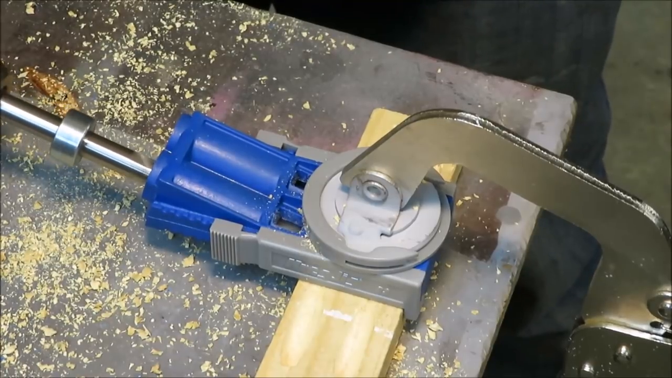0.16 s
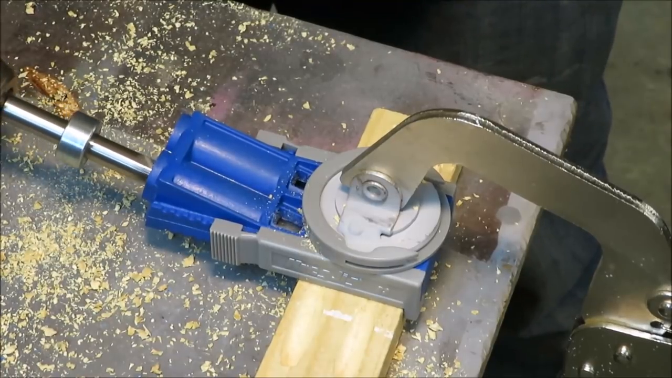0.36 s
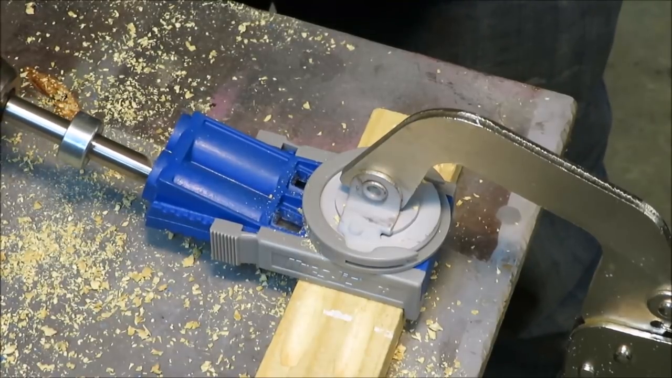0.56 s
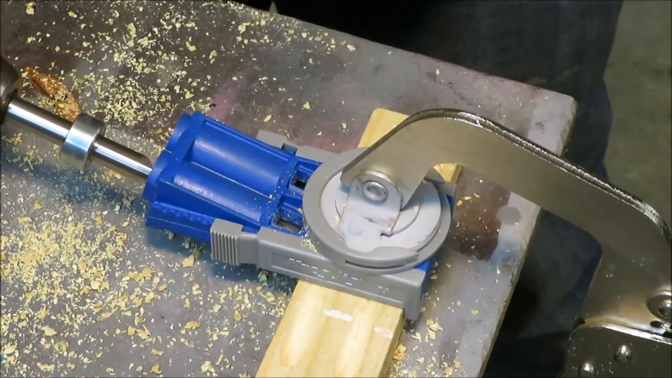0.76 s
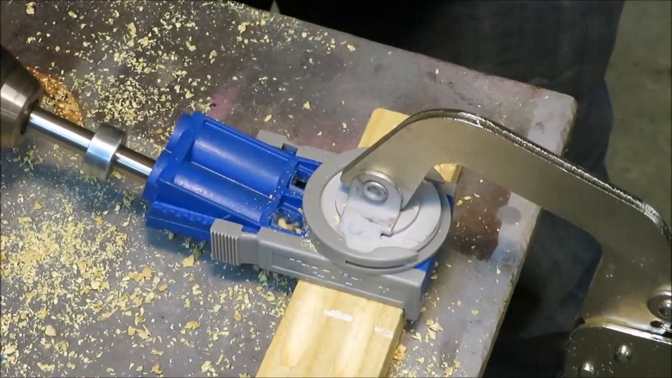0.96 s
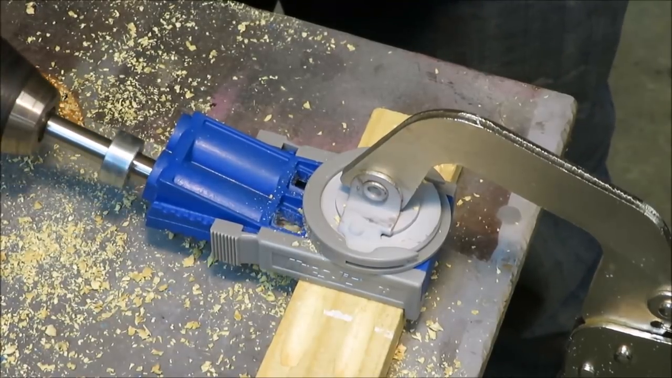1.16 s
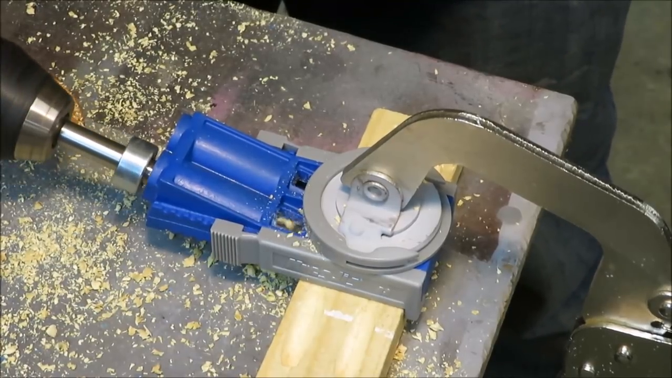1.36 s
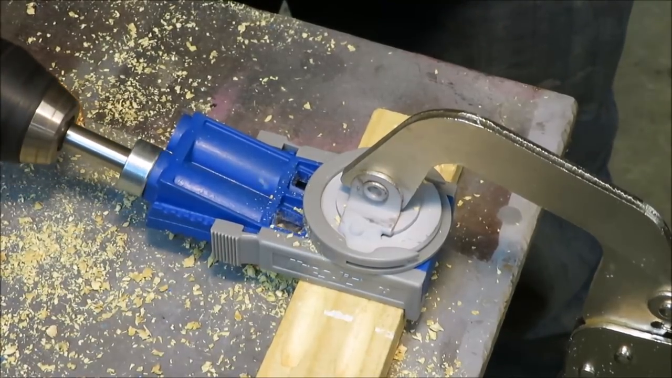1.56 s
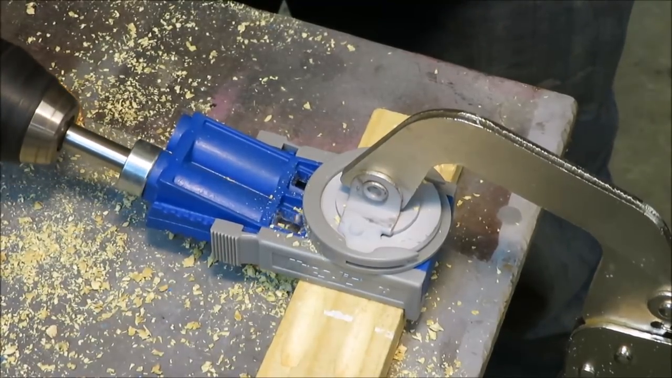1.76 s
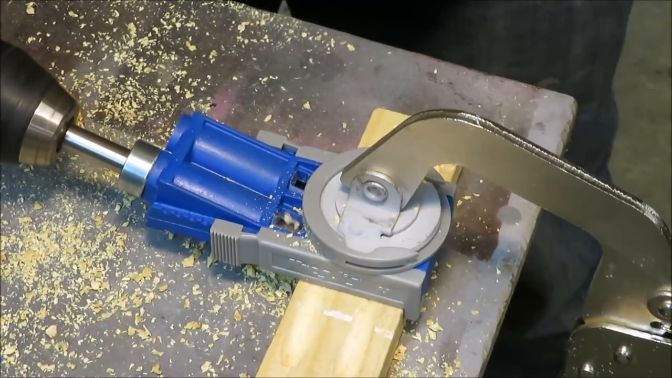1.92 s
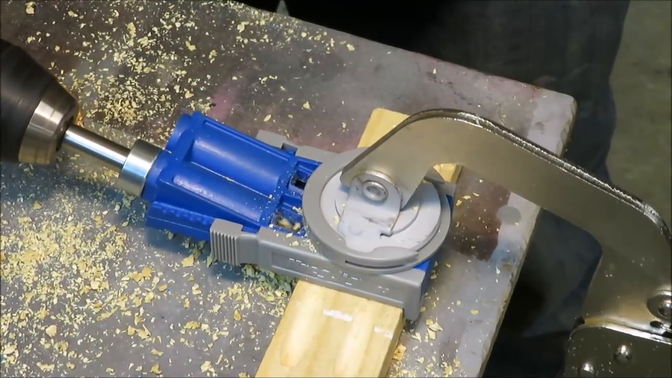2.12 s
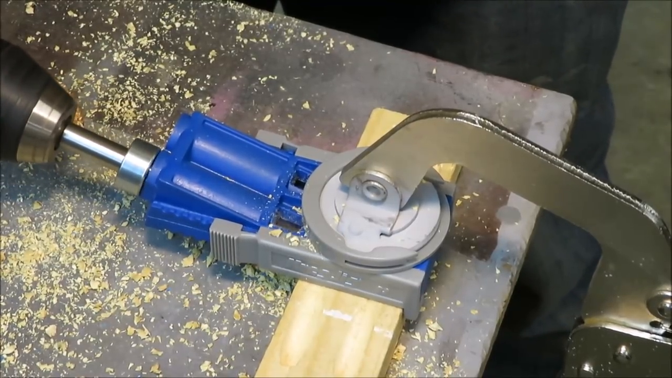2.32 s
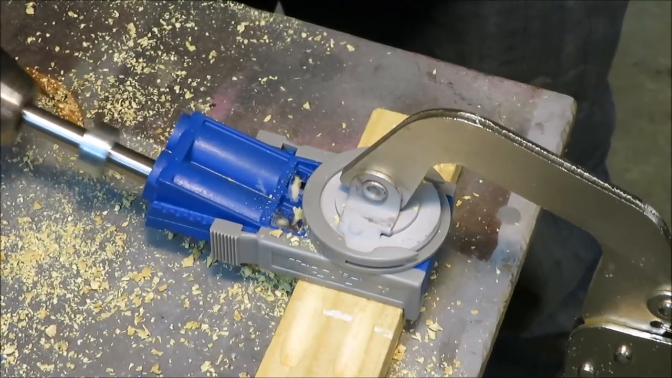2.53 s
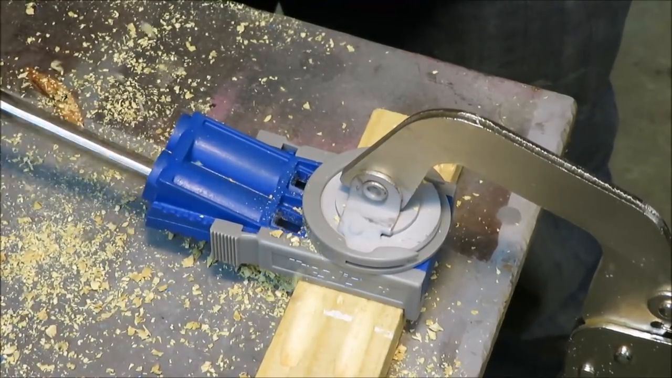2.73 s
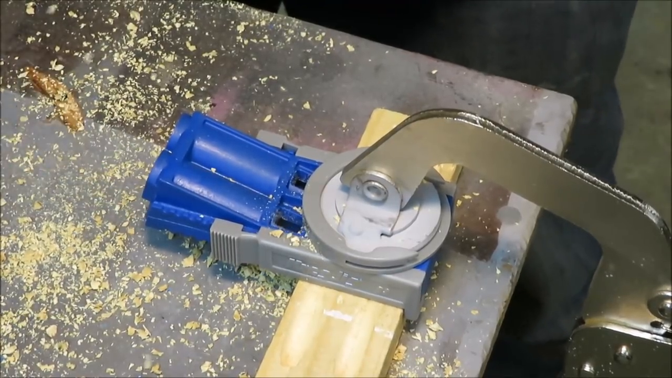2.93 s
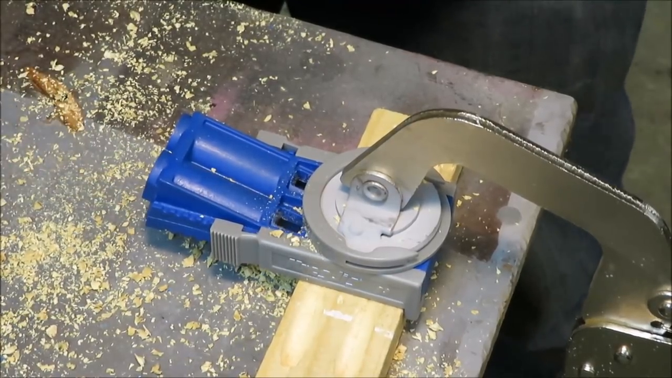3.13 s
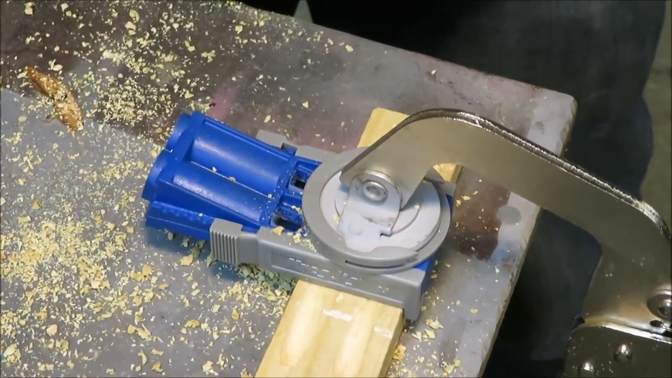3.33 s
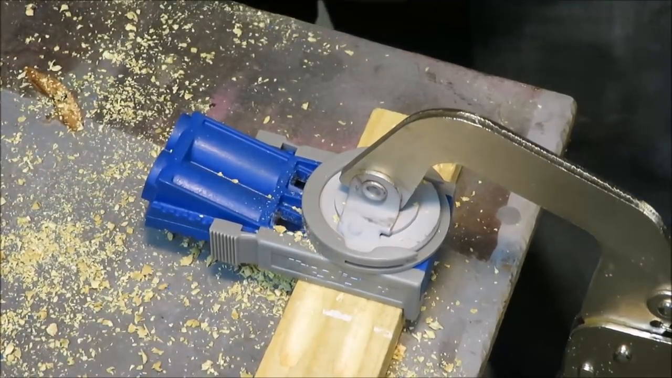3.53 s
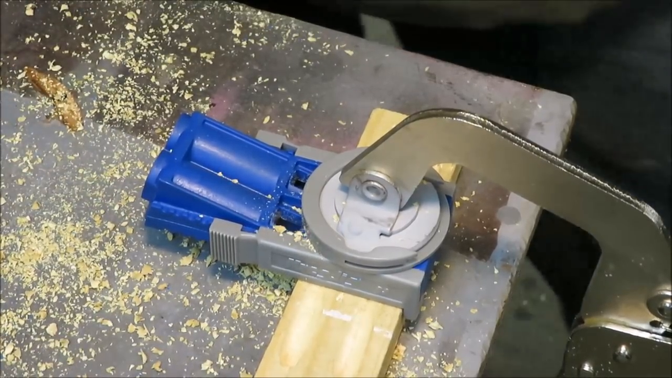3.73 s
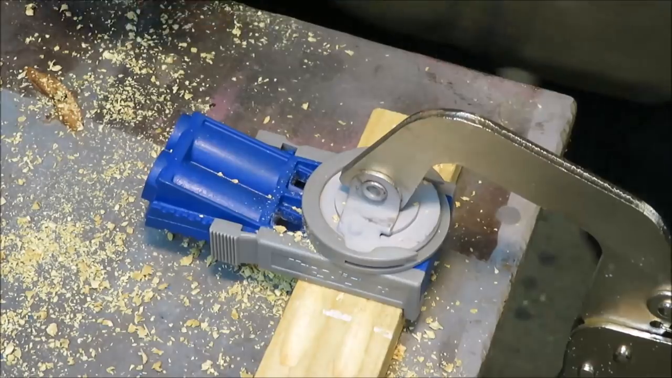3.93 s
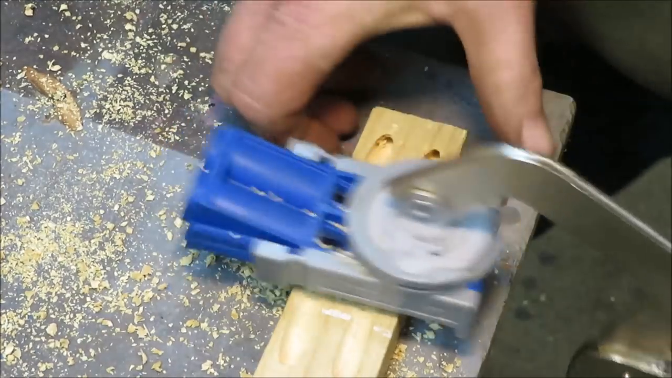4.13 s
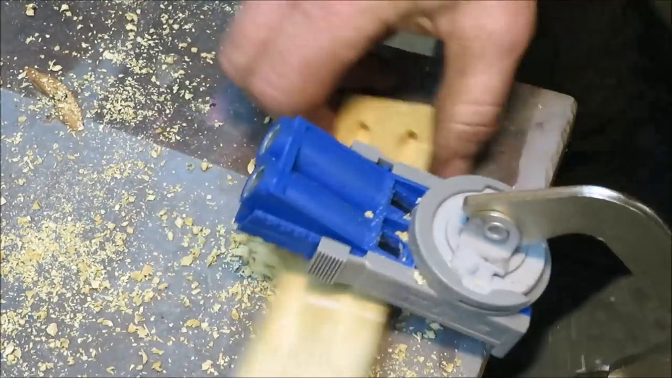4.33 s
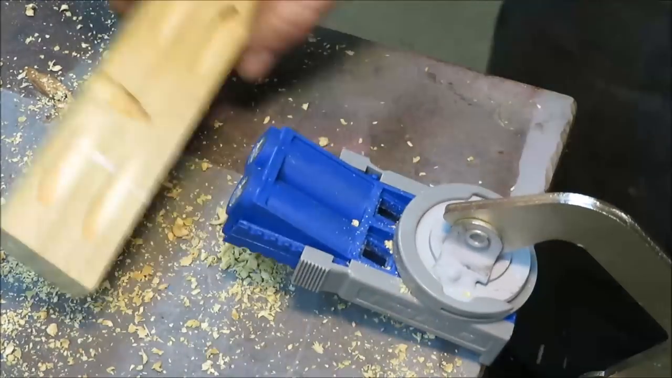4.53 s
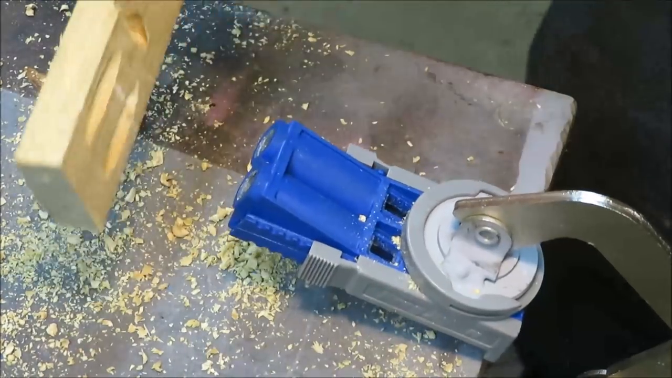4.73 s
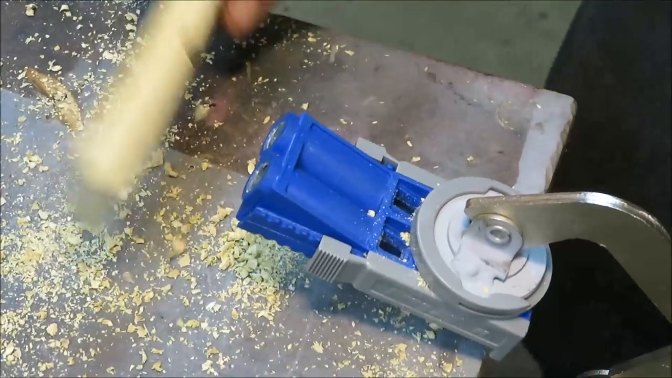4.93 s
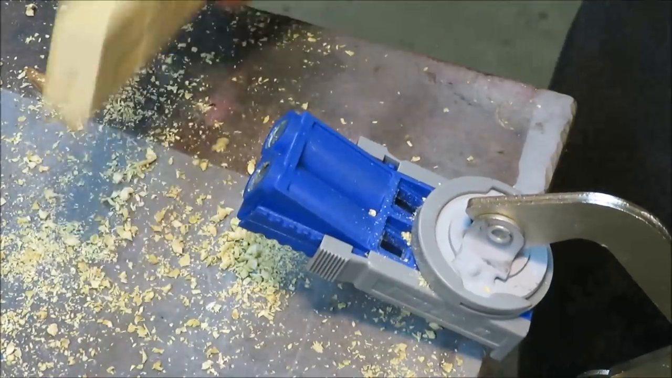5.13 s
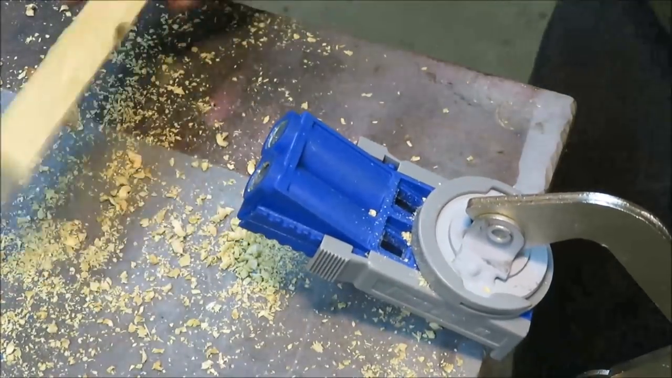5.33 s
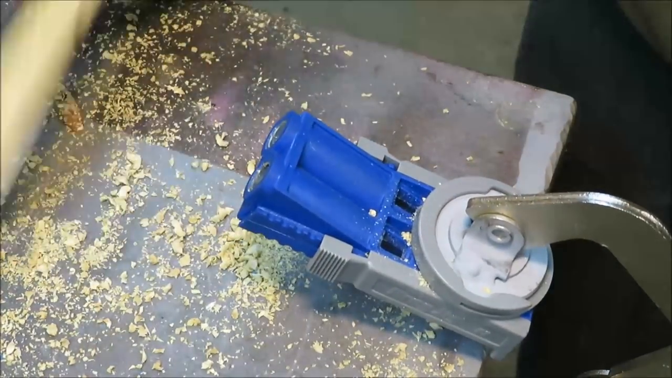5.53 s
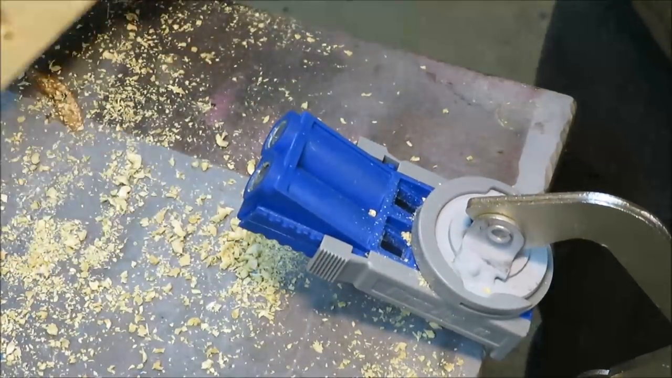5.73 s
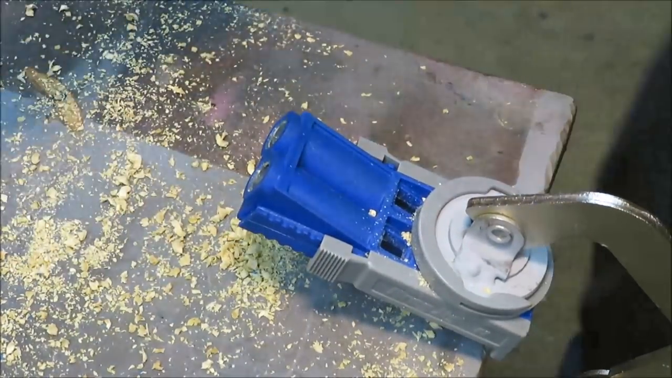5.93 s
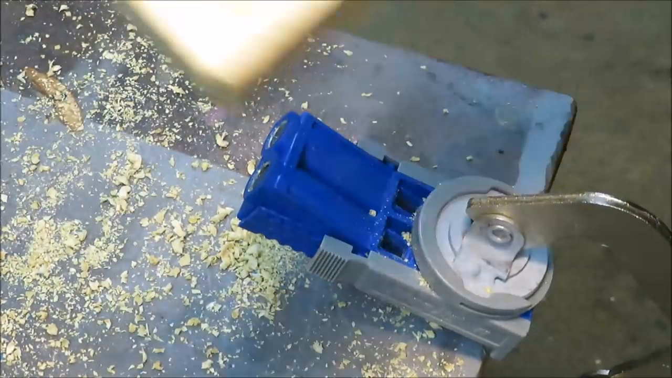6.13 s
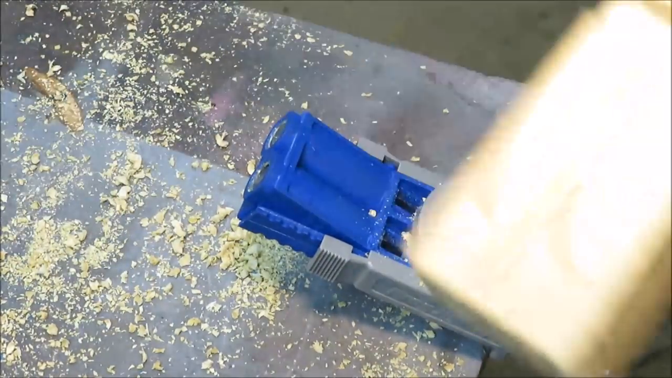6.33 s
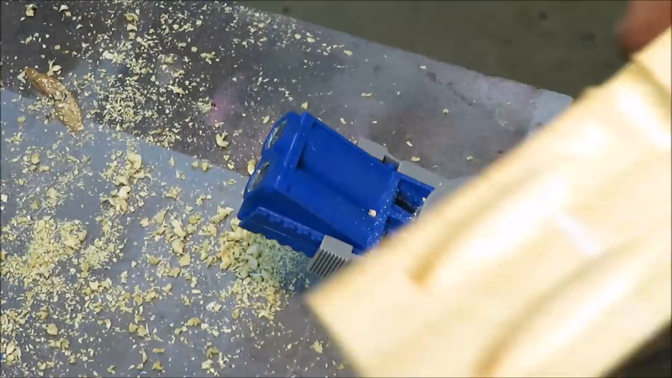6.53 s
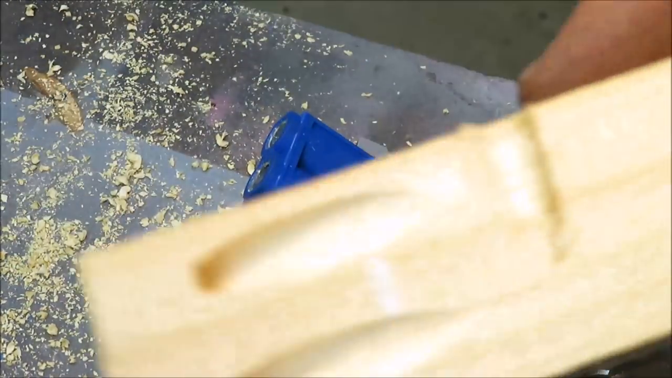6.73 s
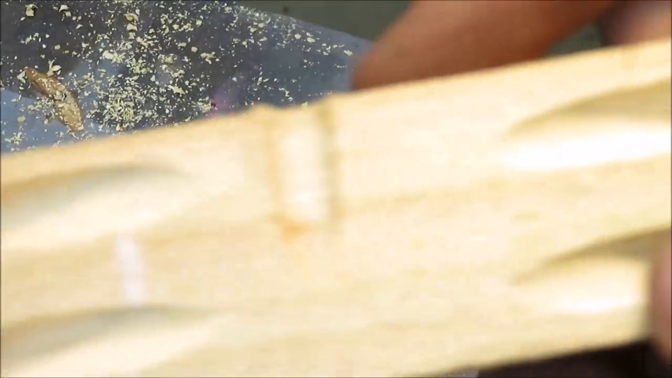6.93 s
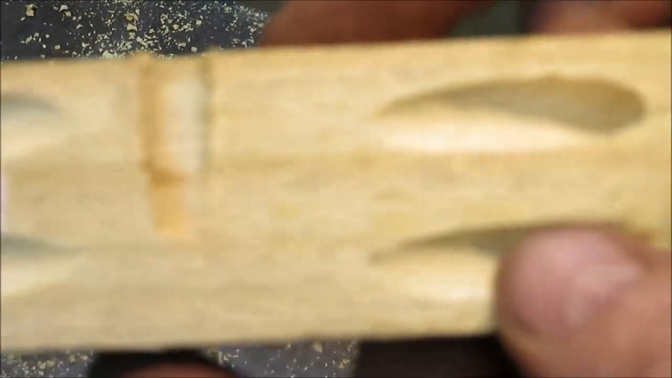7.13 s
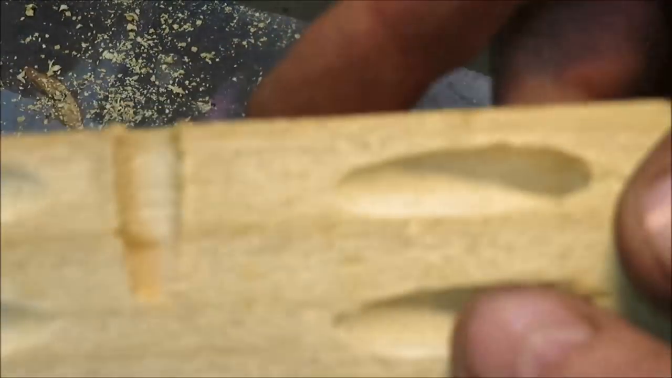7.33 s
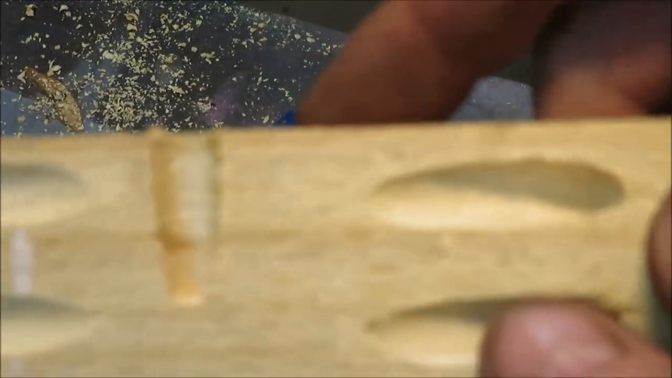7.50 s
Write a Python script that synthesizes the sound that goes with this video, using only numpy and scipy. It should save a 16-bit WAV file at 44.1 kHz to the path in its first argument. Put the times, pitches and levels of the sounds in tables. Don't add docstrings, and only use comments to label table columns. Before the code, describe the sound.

Geared drill motor bores softwood and brakes abruptly; tool set down, metal clamp snaps open, wood block knocked six times, chips patter faintly.

```python
import sys
import numpy as np
from scipy import signal
from scipy.fft import rfft, irfft, next_fast_len
from scipy.io import wavfile
from scipy.ndimage import uniform_filter1d

SR = 44100
rng = np.random.default_rng(int(sys.argv[2]) if len(sys.argv) > 2 else 0)


def ratio_of_db(decibels):
    return 10 ** (np.asarray(decibels, float) / 20)


def int16_out(signal):
    q = np.round(np.clip(np.atleast_2d(signal).T, -1, 1) * 32767)
    wavfile.write(sys.argv[1], SR, q.astype(np.int16))


N = 333524
T = np.arange(N) / SR


def level(x, db):
    return x * ratio_of_db(db) / np.sqrt(np.mean(x ** 2))


def on_log(points, hz):
    table_hz, value = np.transpose(points)
    return np.interp(np.log(np.maximum(hz, 1)), np.log(table_hz), value)


def shape(x, gain_of_hz):
    n = next_fast_len(x.shape[-1])
    spectrum = rfft(x, n) * gain_of_hz(np.fft.rfftfreq(n, 1 / SR))
    return irfft(spectrum, n)[..., :x.shape[-1]]


def butter(x, order, hz, kind):
    return signal.sosfilt(signal.butter(order, hz, kind, fs=SR, output="sos"), x)


def resonate(x, peaks):
    return sum(ratio_of_db(db) * signal.lfilter(*signal.iirpeak(hz, hz / width, fs=SR), x) for hz, width, db in peaks)


def decay(t, t60):
    return np.exp(-np.log(1000) * t / t60)


def add(out, s, y):
    i = int(s * SR)
    out[i:i + len(y)] += y[:N - i]


def walk(rate_hz):
    hold = int(SR / rate_hz)
    steps = np.repeat(rng.standard_normal(N // hold + 1), hold)
    return 1.47 * uniform_filter1d(uniform_filter1d(steps, hold), hold)[:N]


def grit(rate_hz, spread_db):
    hit = rng.random(N) < rate_hz / SR
    size = ratio_of_db(spread_db * np.minimum(rng.exponential(size=N), 3))
    clicks = hit * size * rng.standard_normal(N)
    return level(level(clicks, 0) + rng.standard_normal(N), 0)


def tilted(modes, db_per_octave, pivot_hz):
    return [(hz, db + db_per_octave * np.log2(hz / pivot_hz), t60) for hz, db, t60 in modes]


def ring(modes, chance, contact, scatter_db=3.5, spin=31.):
    t = T[:SR // 4]
    y = 0
    for (hz, db, t60), c in zip(modes, chance):
        phase = 2 * np.pi * (hz * (1 + 0.0072 * c) * t + spin * c)
        y = y + ratio_of_db(db + scatter_db * c) * np.sin(phase) * decay(t, t60)
    y = signal.fftconvolve(y * np.minimum(t / 0.00052, 1), contact)
    y = butter(y, 2, 110, "high")
    return y / np.abs(y).max()


def crack(noise, t60, low_hz, top_hz):
    t = T[:len(noise)]
    burst = noise * decay(t, t60) * np.minimum(t / 0.00066, 1)
    return butter(burst, 1, [low_hz, top_hz], "band") / 2


def chatter(noise, ms):
    u = T[:len(noise)] * 1000 / max(ms, .3)
    return noise * np.sqrt(u) * np.exp(-u)


# Hz, dB.
SIDE_TILT = [(250, -14), (500, -1.5), (1000, -0.5), (2400, -4), (3500, 1.5), (5500, 0.5), (8000, -1.5),
             (12000, -0.5)]


def diffuse(mid, side):
    port_gap_m, sound_m_per_s = 0.021, 343
    like = lambda hz: np.clip(np.sinc(2 * hz * port_gap_m / sound_m_per_s), -1, .9998)
    mid = shape(mid, lambda hz: np.sqrt((1 + like(hz)) / 2))
    side = shape(side, lambda hz: ratio_of_db(on_log(SIDE_TILT, hz)) * np.sqrt((1 - like(hz)) / 2))
    return np.array([mid + side, mid - side])


# Hz, dB per Hz.
SHOP_AIR = [(15, -24), (40, -13.5), (278, -6.5), (415, -12), (573, -11.5), (729, -16), (2130, -16.5),
            (3350, -23.5), (12800, -34), (15000, -51)]


def shop_air():
    air = rng.standard_normal((2, N)) * ratio_of_db(.9 * walk(7.2))
    air = shape(air, lambda hz: ratio_of_db(on_log(SHOP_AIR, hz)))
    return level(diffuse(*air), -59)


ORDERS = [.152, .2, .4, .6, .8, 1.307, 1.957, 2.514, 3, 3.4, 4, 4.4, 4.6, 5, 5, 5.4, 5.8, 6, 6.4, 6.6, 7,
          7.4, 8, 8.4]
# level there in dB, whine there in Hz.
ORDER_PEAKS = [(-40, 1540), (-38, 1585), (-38, 1595), (-37, 1600), (-40, 1605), (-34, 1584), (-39, 1584),
               (-36, 1540), (-46, 1575), (-45, 1605), (-43, 1615), (-39, 1605), (-43, 1580), (-37, 1485),
               (-43, 1618), (-42, 1615), (-45, 1585), (-41, 1555), (-42, 1615), (-47, 1612), (-42, 1558),
               (-48, 1605), (-50, 1590), (-47, 1555)]


def gear_tones(hz, turns, mesh_db):
    tone = lambda order: np.sqrt(2) * np.sin(2 * np.pi * order * turns)
    free_hz, sag_db_per_hz = 1620, .045
    pole_db = -32.5 - sag_db_per_hz * (free_hz - hz)
    tones = ratio_of_db(mesh_db + 1.8 * walk(18)) * tone(1) + ratio_of_db(pole_db + 4.5 + 1.3 * walk(30)) * tone(2.4)
    width_hz, lift_db = 28, 9
    for order, (db, best_hz) in zip(ORDERS, ORDER_PEAKS):
        lift = np.exp(-((hz - best_hz) / width_hz) ** 2) - 1
        tones = tones + ratio_of_db(db + lift_db * lift + 3.3 * walk(10)) * tone(order)
    return tones


# Hz, width in Hz, dB.
BORE = [(88.4, 9.1, -7.5), (170.7, 76, -2), (241.4, 22, -3), (323, 110, -6), (402, 37, 6.5),
        (550, 260, -1.5), (648, 17, -11.5), (794, 150, -7.5), (1310, 790, -15)]
# Hz, width in Hz, dB.
THROB = [(411, 45, -1.5), (870, 83, -8)]


def cutting(chuck):
    cut = resonate(grit(400, 2.2) * ratio_of_db(2.1 * chuck + 0.8 * walk(25)), BORE)
    throb_depth_db = 7
    throb = resonate(grit(300, 2.2) * ratio_of_db(throb_depth_db * chuck + 3.0 * walk(6)), THROB)
    return level(level(cut, 0) + level(throb, -9.5), -1.7)


# Hz, width in Hz, dB.
HOUSING = [(1770, 380, -2.5), (2070, 460, 0.5), (3020, 890, 1), (4065, 490, 4), (5220, 1000, -10),
           (5880, 1200, -11.5), (7300, 500, -6), (9400, 4600, -2), (12400, 1300, -18.5)]


def housing_rattle(turns, chuck):
    rotor = np.cos(2 * np.pi * .2 * turns)
    swing_db = 0.54 * chuck + 2.5 * rotor + 0.52 * walk(40)
    return level(resonate(grit(4000, 0.42) * ratio_of_db(swing_db), HOUSING), -0.41)


# time in seconds, gear whine in Hz.
SPEED = [(0, 1628), (.3, 1613), (.4, 1599), (.6, 1599), (.85, 1595), (.98, 1538), (1.17, 1533),
         (1.23, 1450), (1.37, 1503), (1.53, 1458), (1.6, 1528), (1.75, 1553), (2.1, 1574), (2.36, 1588),
         (2.6, 1594), (2.68, 1603), (2.8, 1618), (2.894, 1618)]
BITE_DB = [-22, -22.5, -18, -25, -18, -20, -19, -18.5, -21, -23, -22.5, -21, -21.5, -25.5, -19.5, -19,
           -26.5, -26]
MESH_DB = [-28.5, -29, -24.5, -30, -27.5, -30, -25.5, -28, -33, -29, -27.5, -23.5, -27, -25, -28, -30, -32,
           -28.5]


def drill():
    s, whine_hz = np.transpose(SPEED)
    hz, cut_db, mesh_db = (np.interp(T, s, v) for v in (whine_hz, BITE_DB, MESH_DB))
    pull_out_s, fade_db_per_s = 2.52, 10
    housing_db = -18.5 - fade_db_per_s * np.maximum(T - pull_out_s, 0) + 0.83 * walk(12)
    turns = np.cumsum(hz * (1 + .0009 * walk(40))) / SR
    chuck_per_whine = .0143
    chuck = np.cos(2 * np.pi * chuck_per_whine * turns + .6 * walk(3))
    running = np.clip((s[-1] - T) / 0.011, 0, 1)
    tones = gear_tones(hz, turns, mesh_db)
    motor = ratio_of_db(cut_db) * cutting(chuck) + ratio_of_db(housing_db) * housing_rattle(turns, chuck)
    return running * tones, running * motor


# time in seconds, peak in dB, t60 in seconds.
BRAKE = [
    (2.8932, 0., .035),
    (2.8962, -1.5, .022),
    (2.9105, -13., .02),
    (2.9185, -14., .035),
]


def brake():
    out = np.zeros(N)
    for s, db, t60 in BRAKE:
        noise = rng.standard_normal(2048)
        snap = crack(noise, t60, 900, 3800) + ratio_of_db(-14.0) * crack(noise[::-1], t60, 5000, 13000)
        add(out, s, ratio_of_db(db) * snap / np.abs(snap).max())
    return out


# time in seconds, Hz, peak in dB, t60 in seconds.
STEEL = [(3.213, 1856, -33, 0.17), (3.215, 700, -25.5, 0.13), (3.381, 10800, -38, 0.35),
         (3.571, 8810, -37, 0.027), (4.137, 2800, -11.5, 0.02), (4.136, 9000, -21, 0.069),
         (4.135, 9400, -19.5, 0.09), (4.137, 9900, -41, .06), (4.136, 10520, -16, 0.055),
         (4.268, 8590, -27, 0.036), (4.467, 3030, -13, .015), (4.711, 4157, -39, 0.095),
         (4.75, 10860, -28.5, 0.15), (6.335, 7300, -61, 0.03), (6.335, 8600, -58, 0.024)]
# share off in frequency, dB.
CLUSTER = [(-.026, -7), (-.011, -2.5), (0, -1.5), (.007, -2), (.019, -4), (.1, -12.5)]


def steel():
    out = np.zeros(N)
    for s, hz, db, t60 in STEEL:
        close = np.clip(.06 / t60, .25, 1.5)
        modes = [(hz * (1 + close * off), d, t60) for off, d in CLUSTER]
        add(out, s, ratio_of_db(db) * ring(modes, .3 * rng.standard_normal(len(CLUSTER)), np.ones(1)))
    return out


# time in seconds, body peak in dB, thud in dB, click in dB, hardness in dB per octave.
CLACKS = [(3.214, -21, 3.5, -5, 3.5), (3.259, -34, 7, -30, -2), (3.333, -44, -3, 1, 3),
          (3.371, -19, 14.5, -14.5, 3), (3.379, -22, 10.5, -5, 2.5), (3.391, -17, 10, -6, 3.5),
          (3.432, -29, 12.5, -25, -1), (3.440, -24.5, 5, -24, -4.5), (3.461, -24, -3, -18, 1.5),
          (3.533, -26.5, 2.5, -19.5, -11), (3.571, -24.5, -1.5, -6.5, 2.5), (3.695, -31, -3, -11, 12.5),
          (3.856, -42, -6, -10.5, 1), (4.11, -35, -2.5, -9, -1.5), (4.130, -29.5, -4, -2.5, -3),
          (4.135, -12, -19.5, 2, -2), (4.164, -10.5, -11.5, -17.5, -2.5), (4.171, -12, -8.5, -18.5, -1),
          (4.214, -15, -8.5, -21.5, -5), (4.223, -14.5, -9, -23.5, -2.5), (4.259, -18, -6, -11.5, 5.5),
          (4.268, -14.5, -3.5, -9.5, 4), (4.277, -21, -9.5, -16.5, -1), (4.297, -17, -8.5, -21.5, 3),
          (4.41, -26.5, -8.5, -15.5, 6), (4.428, -11.5, -10, -22, 6), (4.437, -22.5, 6, -24.5, -3.5),
          (4.448, -17.5, -8.5, -7, 5.5), (4.466, -11.5, -15, -14, 3), (4.489, -25, -5.5, -9, 3),
          (4.711, -26.5, -16, -23.5, 1.5), (4.729, -40.5, 13, -24.5, -3), (4.735, -38.5, 14, -24.5, -3.5),
          (4.742, -33, 12, -21.5, -2.5), (4.749, -32.5, 7, 15.5, 0.5), (4.755, -27.5, 2.5, 6, 4.5),
          (4.764, -27, 3, -8, 2), (4.832, -42.5, 3, -3, 5), (4.869, -41.5, 4.5, -27, -0.5),
          (6.836, -57, 14, -12.5, -7), (7.038, -53, 11, -12, 2), (7.245, -50, 9, -43, -3)]
# Hz, dB, t60 in seconds.
BENCH = [(123.4, -1, 0.09), (167, 1, 0.071), (181, -2, 0.079), (240, 0.5, 0.017), (284.6, -4, 0.091),
         (357, -2.5, 0.064), (410, 2, 0.028), (440, -4, 0.026), (564, 2, 0.029)]
# Hz, dB, t60 in seconds.
JIG = [(447, -3, 0.015), (586, -9, 0.01), (835, -4.5, 0.026), (975, 10, 0.0024), (1266, -3, 0.016),
       (1530, 6.5, 0.0026), (1940, -1, 0.0077), (2400, 2, 0.0046), (2936, -6, 0.0061), (3690, 3, 0.0025)]


def clacks():
    out, clicks = np.zeros(N), np.zeros(N)
    contact_ms = 3.68
    for s, db, thud_db, click_db, hard_db in CLACKS:
        chance, noise = rng.standard_normal(20), rng.standard_normal(2048)
        body = ring(tilted(JIG, hard_db, 1200), chance, chatter(noise, contact_ms), scatter_db=2.0)
        thud = ring(tilted(BENCH, hard_db, 250), chance[10:], np.hanning(48), scatter_db=4.0)
        add(out, s, ratio_of_db(db) * body)
        add(out, s, ratio_of_db(db + thud_db) * thud)
        click = crack(noise[::-1], 0.0045 * contact_ms, 2300, 14000)
        add(clicks, s, ratio_of_db(db + click_db + 8.5) * click)
    return out, clicks


# time in seconds, dB.
ROCKS = [
    (3.371, -10),
    (3.390, -15),
    (3.412, -15),
    (3.432, -9.5),
    (3.447, -14),
    (3.468, -27),
    (3.50, -22),
    (3.535, -26),
    (4.44, -27),
    (4.454, -26),
]
# Hz, dB, t60 in seconds.
SLAB = [(104, -3.5, 0.092), (141, -3.5, 0.11), (191, -4, .09), (239, -1, 0.085), (288, 2.5, 0.087),
        (360, -7, .06)]


def rocking():
    out = np.zeros(N)
    modes = [(hz, db, min(t60, .12)) for hz, db, t60 in SLAB]
    for (s, db), chance in zip(ROCKS, rng.standard_normal((len(ROCKS), len(SLAB)))):
        add(out, s, ratio_of_db(db) * ring(modes, chance, np.hanning(70), scatter_db=1.0))
    return out


# Hz, dB per Hz.
RUB_DULL = [(41, -48.5), (70, -3), (218, -18), (421, -5.5), (466, -9), (561, -9), (665, -9.5), (4000, -26),
            (5200, -33), (8800, -120)]
# Hz, dB per Hz.
RUB_BRIGHT = [(880, -37), (1500, -8.5), (2100, -3.5), (3210, -10.5), (3500, -16.5), (5000, -10.5),
              (8580, -14.5), (14000, -21.5), (15000, -40)]
# full pressure at seconds, held seconds, dB, bright part in dB under it.
STROKES = [(3.41, 0.034, -21.5, -19), (3.868, 0.012, -43, -15.5), (4.19, 0.024, -22.5, -15.5),
           (4.26, 0.025, -39, -16), (4.445, 0.013, -28, -15), (4.56, 0.39, -46.5, -14.5),
           (6.289, 0.033, -65, -13), (6.415, 0.036, -48, -14), (6.6, 0.036, -87, -1.5),
           (6.845, 0.011, -63.5, -2), (6.87, 0.35, -61.5, -4.5), (7.13, 0.012, -64, -7),
           (7.24, 0.25, -53, -28)]


def rubbing():
    drag = ratio_of_db(2.5 * walk(40))
    dull = level(shape(grit(990, 1.5) * drag, lambda hz: ratio_of_db(on_log(RUB_DULL, hz))), -6.5)
    bright = level(shape(grit(1500, 1.3) * drag, lambda hz: ratio_of_db(on_log(RUB_BRIGHT, hz))), -0.31)
    press_db_per_s, lift_db_per_s = 696.5, 165.5
    out = np.zeros(N)
    for s, held, db, bright_db in STROKES:
        before, after = np.maximum(s - T, 0), np.maximum(T - s - held, 0)
        pressure = ratio_of_db(db - press_db_per_s * before - lift_db_per_s * after)
        out += pressure * (dull + ratio_of_db(bright_db) * bright)
    return out


# time in seconds, peak in dB, share sent to the walls in dB, crack in dB,
# hardness in dB per octave.
KNOCKS = [
    (4.9236, 5.5, -2, -32, 0),
    (5.1004, 0, 0.5, -28, -0.5),
    (5.286, -2.5, 1, -42, 2),
    (5.439, -8, 9.5, -40.5, -5),
    (5.621, -1.5, 2, -42.5, -0.5),
    (5.789, -13, 9.5, -38, -2),
]
# Hz, dB, t60 in seconds.
WOOD = [(337, -13.5, 0.016), (398, -6, 0.047), (487, -7, 0.017), (598, -2.5, 0.066), (700, -3.5, 0.037),
        (784, -12, 0.02), (901, 1, 0.03), (1000, -0.5, 0.022), (1175, 2, 0.022), (1297, 1.5, 0.027),
        (1570, -3, 0.022), (1792, -3.5, 0.024), (2320, -5.5, 0.012), (2690, -9, 0.018)]


def knocks():
    body, cracks, spot = np.zeros(N), np.zeros(N), rng.standard_normal(len(WOOD))
    for s, db, _, crack_db, hard_db in KNOCKS:
        chance = .25 * spot + 0.19 * rng.standard_normal(len(WOOD))
        noise = rng.standard_normal((2, 2048))
        wood = ring(tilted(WOOD, hard_db, 800), chance, np.ones(1), scatter_db=5.0, spin=1.792)
        add(body, s, ratio_of_db(db + 4) * wood)
        add(body, s, ratio_of_db(db - 13.5) * crack(noise[0], .03, 540, 2000))
        add(cracks, s, ratio_of_db(db + crack_db) * crack(noise[1], .02, 3000, 6300))
    return butter(body, 2, 160, "high"), cracks


# time in seconds, dB, swell in seconds, t60 in seconds.
SPILLS = [
    (6.396, -49.5, 0.033, 0.27),
    (6.59, -59.5, .02, .2),
    (6.335, -65, .01, .05),
]


def spill():
    chips = level(butter(grit(600, 3.0), 1, [350, 1800], "band"), 0)
    flow = np.zeros(N)
    for s, db, swell, t60 in SPILLS:
        since = np.maximum(T - s, 0)
        fall = ratio_of_db(db - 60 * np.maximum(since - swell, 0) / t60)
        flow += fall * (since > 0) * (0.41 + 0.71 * np.minimum(since / swell, 1))
    return chips * flow


def slap(low_hz, top_hz):
    push = butter(1. * (T[:1024] == 0), 2, [low_hz, top_hz], "band")
    scatter = .025 * rng.standard_normal(900) * np.exp(-T[:900] / .005)
    return np.convolve(push, np.append(1, scatter))


# Hz, width in Hz, dB.
TABLE_RING = [(385, 30, -4.5), (567, 40, 6.5), (840, 120, 0), (1250, 220, -8.5), (1750, 210, -5.5)]


def spread():
    out = np.zeros(N)
    for s, db, sent_db, _, hard_db in KNOCKS:
        push = slap(320, 2400 * 2 ** np.clip(hard_db / 9, -1.5, 1)) * ratio_of_db(sent_db)
        add(out, s, ratio_of_db(db + 7.0) * push + ratio_of_db(db + 17.5) * resonate(push, TABLE_RING))
    for s, db, _, _, hard_db in CLACKS:
        add(out, s, ratio_of_db(db + 7) * slap(280, 1800 * 2 ** np.clip(hard_db / 6, -1.5, 1.5)))
    return out


# Hz, t60 in seconds.
ROOM_T60 = [(60, 0.98), (250, 0.79), (700, 0.59), (2000, 0.56), (5000, 0.55), (12000, 0.25)]
# Hz, dB.
ROOM_TILT = [(60, -14), (125, -5.5), (250, 4.5), (700, 2.5), (2000, 1), (5000, -4.5), (12000, 3)]


def room(x, wet_db):
    t = T[:int(1.2 * SR)]
    echo = 0
    for hz in 60 * 2 ** np.arange(0, 8.1, .5):
        bell = lambda f: np.exp(-(np.log2(np.maximum(f, 1) / hz) / 0.41) ** 2)
        band = shape(rng.standard_normal((2, len(t))), bell)
        echo = echo + ratio_of_db(on_log(ROOM_TILT, hz)) * band * decay(t, on_log(ROOM_T60, hz))
    echo = echo * np.clip((t - .006) / 0.0093, 0, 1)
    echo = diffuse(*echo) / np.sqrt(np.sum(echo[0] ** 2))
    return ratio_of_db(wet_db) * signal.fftconvolve(x[None], echo, axes=1)[:, :N]


def ports(x, top_lead, pan_db, bend=1.1):
    def half(sign):
        turn = lambda hz: np.exp(.5j * sign * top_lead * (hz / 15000) ** bend)
        return ratio_of_db(sign * pan_db / 2) * shape(x, turn)
    return np.array([half(1), half(-1)])


def scene():
    tones, motor = drill()
    hits, cracks = knocks()
    snap = brake()
    parts, clicks = clacks()
    rub, rings = rubbing(), steel()
    air = shop_air()
    sent = ratio_of_db(-19.5) * tones + ratio_of_db(-7.5) * motor + ratio_of_db(-17.5) * snap
    sent = sent + spread() + ratio_of_db(-16.5) * hits + ratio_of_db(-20.0) * cracks
    sent = sent + ratio_of_db(-6.5) * (parts + clicks) + ratio_of_db(-9) * rings + ratio_of_db(0.5) * rub
    wet = room(sent, -0.069)
    handled = parts + clicks + rings + rub + rocking() + spill()
    set_down = T < 4
    near = ports(tones + motor + snap, 2.93, .45, bend=1.69) + ports(hits + cracks, 2.4, .9)
    near = near + ports(handled * set_down, 1.1, 0.22) + ports(handled * ~set_down, -1.6, -.3)
    return near + wet + air


def top_cut(x):
    return signal.sosfilt(signal.butter(12, 16320, fs=SR, output="sos"), x)


def record(dry):
    x = butter(dry, 3, 68, "high")
    x = butter(x, 2, 15300, "low")
    x = x / (1 + np.abs(x) ** 14) ** (1 / 14)
    x = signal.sosfilt(signal.ellip(6, .3, 50, 15500, fs=SR, output="sos"), x)
    return top_cut(np.clip(x, -1, 1))


dry = scene()
out = record(dry)
int16_out(out)
```